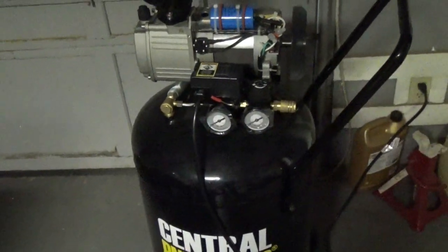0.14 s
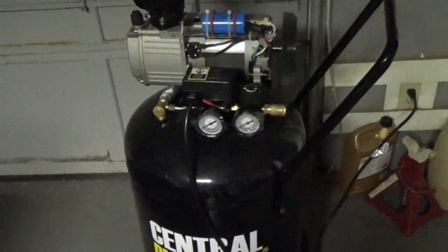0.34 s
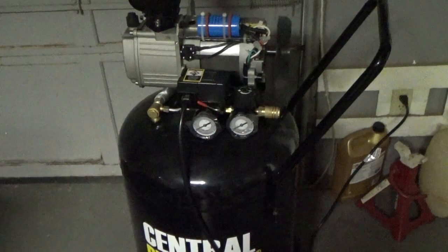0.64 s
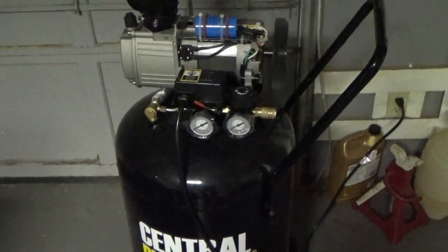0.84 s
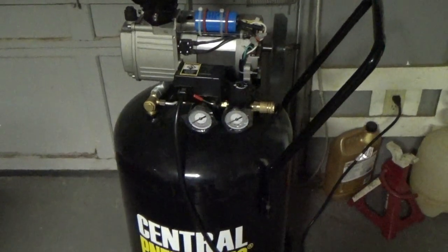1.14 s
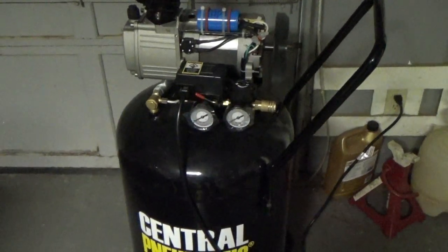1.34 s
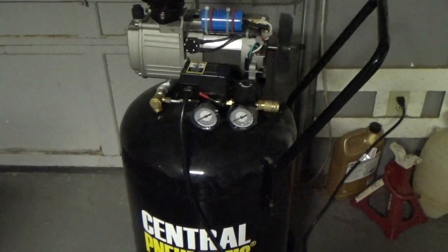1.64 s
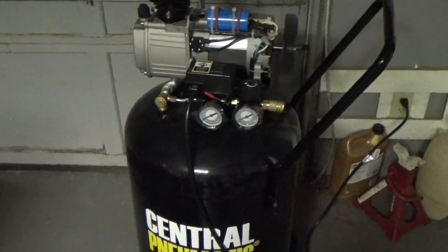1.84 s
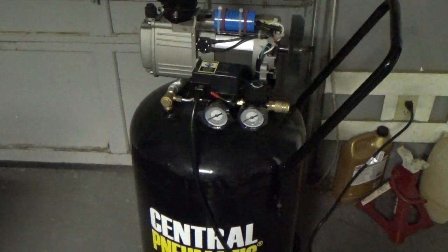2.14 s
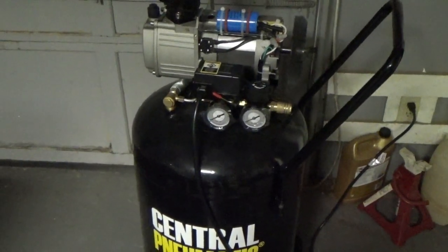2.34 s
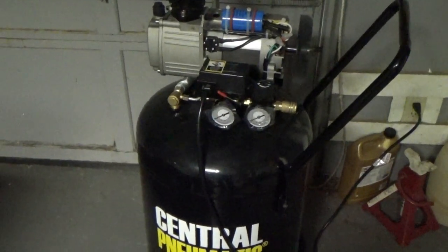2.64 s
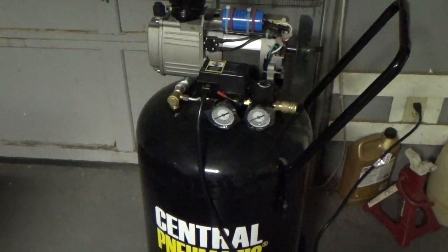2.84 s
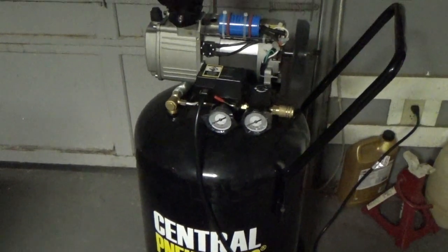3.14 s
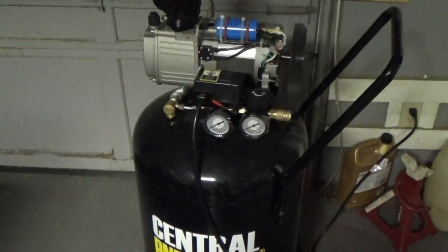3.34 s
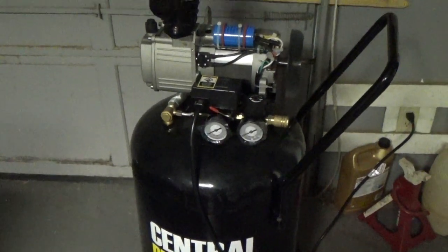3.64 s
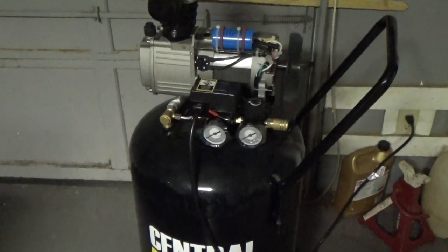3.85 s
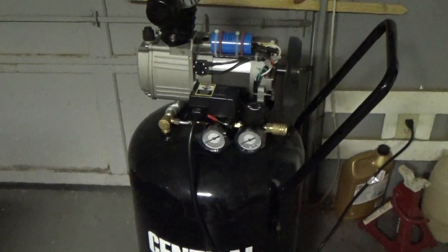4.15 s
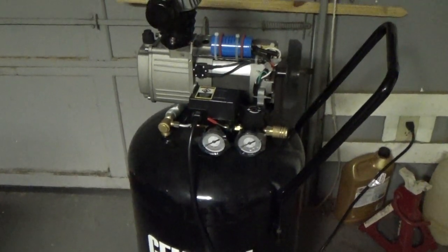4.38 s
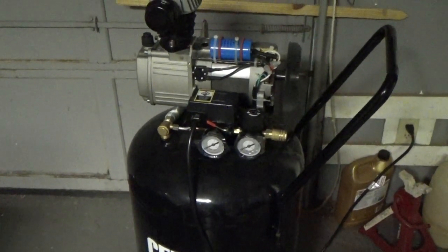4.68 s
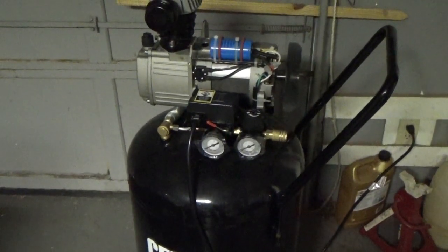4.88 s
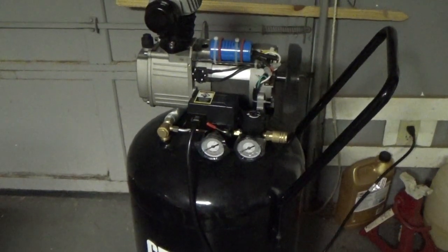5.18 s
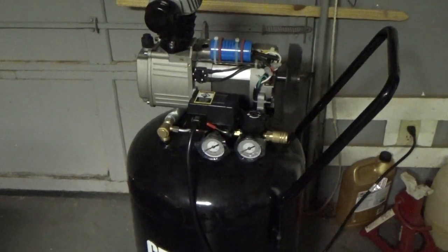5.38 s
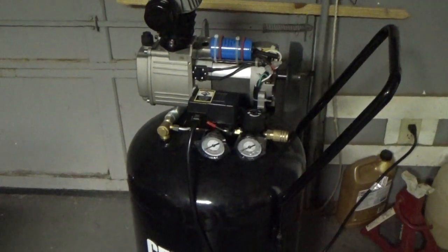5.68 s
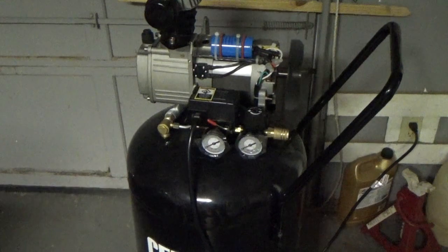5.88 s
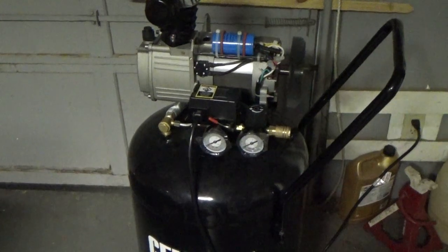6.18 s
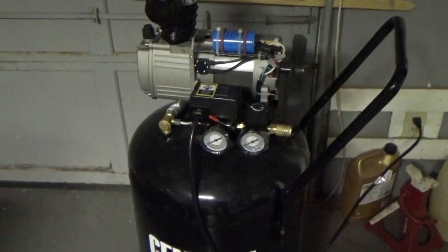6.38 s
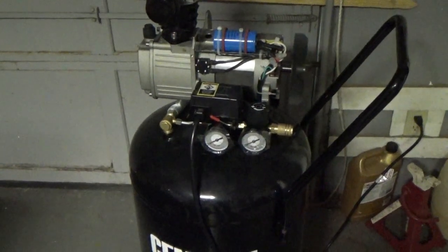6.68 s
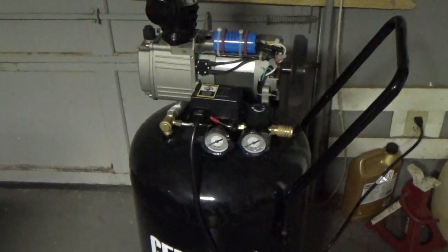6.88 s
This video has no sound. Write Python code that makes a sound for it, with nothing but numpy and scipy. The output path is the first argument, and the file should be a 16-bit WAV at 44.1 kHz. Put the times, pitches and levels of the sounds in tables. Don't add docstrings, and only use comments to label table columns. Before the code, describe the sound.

A piston air compressor runs steadily in a garage, a rough buzzing hum with metallic clatter and sharp airy hiss, growing slightly closer.

```python
import sys
import numpy as np
from scipy import signal
from scipy.fft import rfft, irfft
from scipy.io import wavfile
from scipy.ndimage import uniform_filter1d

SR = 44100
rng = np.random.default_rng(int(sys.argv[2]) if len(sys.argv) > 2 else 0)


def master(y):
    cut = np.clip(np.atleast_2d(y).T, -1, 1)
    pcm = np.round(cut * 32767)
    wavfile.write(sys.argv[1], SR, pcm.astype(np.int16))


def decibels_to_gain(level_db):
    exponent = np.asarray(level_db, float) / 20
    return 10 ** exponent


N = 309582


def level(x, db):
    return x * decibels_to_gain(db) / np.sqrt(np.mean(x ** 2))


def curves(table):
    s, *columns = np.transpose(table)
    return [np.interp(np.arange(N) / SR, s, c) for c in columns]


def bins_hz():
    return np.arange(N // 2 + 1) * SR / N


def along(table, hz):
    f, v = np.transpose(table)
    return np.interp(np.log(hz + 1), np.log(f + 1), v)


def colour(x, table):
    hz = bins_hz()
    inside = (hz > table[0][0]) & (hz < table[-1][0])
    return irfft(rfft(x) * decibels_to_gain(along(table, hz)) * inside, N)


def ring(x, modes):
    out = 0
    for hz, width, db in modes:
        b, a = signal.iirpeak(hz, hz / width, SR)
        out = out + decibels_to_gain(db) * signal.lfilter(b, a, x)
    return out


def steep(x, modes):
    out = 0
    for hz, width, db in modes:
        once = ring(x, [(hz, width, 0)])
        out = out + ring(once, [(hz, width, db)])
    return out


def walk(rate):
    levels = rng.standard_normal(int(N / SR * rate) + 2)
    steps = uniform_filter1d(np.repeat(levels, 8), 8)
    return np.interp(np.arange(N) * rate * 8 / SR, np.arange(len(steps)), steps)


def echoes(x, t60_s):
    t = np.arange(SR // 2) / SR
    tail = rng.standard_normal(len(t)) * np.exp(-np.log(1000) * t / t60_s)
    return signal.fftconvolve(x, tail / np.sqrt(np.sum(tail ** 2)))[:N]


def repeating(turn, memory, size):
    keep = np.exp(-1 / memory)
    turns = int(turn[-1])
    fresh = rng.standard_normal((turns + 100, size))
    rounds = signal.lfilter([np.sqrt(1 - keep ** 2)], [1, -keep], fresh, axis=0)
    rounds = rounds[-turns - 2:]
    return rounds.ravel()[(turn * size).astype(int)]


# (time [s], rate [turns/s])
SHAFT_SPEED = [(0, 57.59), (1.4, 57.614), (2.3, 57.618), (3.1, 57.598), (7.02, 57.582)]


def shaft_turns():
    return np.cumsum(curves(SHAFT_SPEED)[0]) / SR


# (time [s], closeness [0 far - 1 near])
STANCE_PATH = [
    (0, 0.069),
    (2.9, 0.069),
    (3.5, 0.55),
    (4.9, 0.64),
    (7.02, 1),
]


def closeness():
    return curves(STANCE_PATH)[0]


def heard(levels_db, beams=()):
    edge_s = 0.17
    t, close = np.arange(N) / SR, closeness()
    out = [far + (near - far) * close for far, near in levels_db]
    for part, start, end, db in beams:
        inside = np.clip(np.minimum(t - start, end - t) / edge_s + .5, 0, 1)
        out[round(part)] = out[round(part)] + db * inside
    return out


# (multiple of the shaft rate [-], level [dB])
HUM_FAR_LINES = [(1, -36), (2, -23.5), (3, -14.5), (4, -12.5), (5, -7), (6, -24.5), (7, -9.5), (8, 0.5),
                 (9, -5), (10, -15), (11, 0), (12, -19), (13, 0.5), (14, -48), (15, -9), (16, -9),
                 (17, -20), (18, -21.5), (19, -22.5), (20, -14.5), (21, -12), (22, -32), (23, -11),
                 (24, -24), (25, -38), (26, -25), (27, -11.5), (28, -34), (29, -6), (30, -29)]
# (multiple of the shaft rate [-], level [dB])
HUM_NEAR_LINES = [(1, -41), (2, -20.5), (3, -11.5), (4, -8.5), (5, -5.5), (6, -24), (7, -11), (8, 1.5),
                  (9, -10.5), (10, -1), (11, -3), (12, -13.5), (13, -4), (14, -9), (15, -7), (16, -6.5),
                  (17, -16), (18, -17), (19, -33), (20, -14.5), (21, -9.5), (22, -39), (23, -42), (24, -16),
                  (25, -29), (26, -17.5), (27, -32), (28, -26), (29, -7), (30, -21)]
TURN_THUDS = [
    (.158, .41),
    (.322, .98),
    (.852, .95),
]


def hum(turn):
    place, size = np.transpose(TURN_THUDS)
    moved = np.clip(closeness(), 0, 1)
    out = 0
    for (k, far_db), (_, near_db) in zip(HUM_FAR_LINES, HUM_NEAR_LINES):
        thud_phase = np.angle(np.sum(size * np.exp(-2j * np.pi * k * place)))
        start = thud_phase - np.pi / 2 + 2.4 / k
        gain = decibels_to_gain(far_db) + (decibels_to_gain(near_db) - decibels_to_gain(far_db)) * moved
        waver = .08 * walk(3)
        out = out + gain * np.cos(2 * np.pi * k * turn + start + waver)
    return level(out, 0)


# (place in the turn [0-1], level [dB], ringing part [index])
VALVE_KNOCKS = [(.45, -2, 0), (.75, -1, 0), (.97, -1, 0), (.24, -3, 1), (.55, 0, 1), (.8, -7, 1),
                (.8, 0, 2), (.03, -9, 2), (.57, -10, 2), (.58, -6, 3), (.8, 0, 3), (.04, -5, 3),
                (.26, -2, 4), (.54, 0, 4), (.04, -2, 4), (.27, 0, 5), (.58, -3, 5), (.02, 0, 6),
                (.48, -2, 6)]
# (frequency [Hz], width [Hz], level [dB])
PART_MODES = [
    [(2236, 60, 0)],
    [(2995, 110, 0), (3110, 40, -6)],
    [(4745, 170, 0), (4550, 30, -6)],
    [(5015, 45, 0), (5345, 80, -2), (2822, 20, -3), (1960, 35, -3)],
    [(6600, 60, 0), (7960, 40, 0), (8230, 30, -1), (7620, 60, -4), (5520, 45, -2)],
    [(2420, 25, 0), (2822, 25, 0), (3170, 30, 0), (6280, 28, -2), (5300, 30, -3)],
    [(4085, 30, 5), (5640, 35, -3), (3510, 25, -2), (2020, 28, -1), (3050, 30, -1)],
]
# (far level [dB], near level [dB])
PART_LEVELS = [(-42, -40), (-33, -44), (-41, -41), (-38, -42), (-41, -43), (-46, -42), (-46, -43)]
# (part [index], start [s], end [s], gain [dB])
PART_BEAMS = [(0, 0, .5, 6), (0, 2.5, 2.8, 9), (0, 3.3, 4.1, 7), (0, 4.4, 5, 5), (0, 5.25, 5.7, 5),
              (0, 6.05, 7.1, 6), (1, -.2, 1, 3.5), (1, 1.6, 2.6, 2), (1, 6.2, 7.1, 5), (2, .75, 3.4, 9),
              (2, 1.7, 2.4, 3), (2, 5.2, 6.4, 3), (3, .75, 3.4, 5), (4, 1.8, 3.2, 4), (5, -.2, .6, 7),
              (5, 4, 7.1, 2), (5, 5, 7.1, 4), (6, 3.8, 5, 8), (6, 5.6, 6.1, 5)]


def knocks(turn):
    hits, s = np.zeros((len(PART_MODES), N)), np.arange(N)
    whole = np.arange(1, int(turn[-1]))
    for place, db, part in VALVE_KNOCKS:
        time_chance, force_chance = rng.standard_normal((len(whole), 2)).T
        at = np.interp(whole - 1 + place + .0004 * time_chance, turn, s)
        at = np.clip(at, 0, N - 2)
        i = at.astype(int)
        force = decibels_to_gain(db + 1.5 * force_chance + 1.0 * walk(6)[i])
        hits[int(part), i] += force * (1 - at + i)
        hits[int(part), i + 1] += force * (at - i)
    hits[0] += .07 * rng.standard_normal(N) * decibels_to_gain(2.2 * walk(8))
    rings = 0
    for hit, modes, db in zip(hits, PART_MODES, heard(PART_LEVELS, PART_BEAMS)):
        rings = rings + level(ring(hit, modes), db)
    return rings + decibels_to_gain(-13.5) * echoes(rings, t60_s=0.38)


# (frequency [Hz], level [dB per Hz])
CLATTER_SPECTRUM = [(410, -47), (700, -14), (738, 3.5), (796, -4), (895, 3.5), (975, -0.5), (1450, -3),
                    (2220, -1), (2520, 4), (4260, -1.5), (4890, -3.5), (6960, -3.5), (9000, -20),
                    (11700, -37), (19800, -120)]


def clatter(turn):
    pattern = uniform_filter1d(repeating(turn, 200., size=30), 15)
    bunches = decibels_to_gain(3.0 * pattern + .8 * walk(7))
    rattle = bunches * repeating(turn, 30., size=700)
    return level(colour(rattle, CLATTER_SPECTRUM), 0)


def puff(turn, place, fade):
    return uniform_filter1d(np.exp(-((turn - place) % 1) / fade), size=12)


def snaps(turn, place):
    at = np.flatnonzero(np.diff(np.floor(turn - place)))
    out = np.zeros(N)
    out[at] = decibels_to_gain(2.0 * rng.standard_normal(len(at)))
    return out


# (place in the turn [0-1], level [dB], fade [turns])
VALVE_PUFFS = [
    (.04, 0, 0.065),
    (0.229, 3.5, 0.13),
    (.4, 2, 0.058),
    (.53, 1.5, 0.11),
    (.68, 2, 0.21),
]
# (frequency [Hz], level [dB per Hz])
HISS_SPECTRUM = [(880, -38), (1500, -25), (1630, -10.5), (2220, -3.5), (2440, -14), (2920, -7.5),
                 (4280, -11), (4700, -5.5), (7150, -9.5), (9880, 1), (10800, -4), (13500, -1), (14600, -27)]
# (frequency [Hz], width [Hz], level [dB])
PASSAGE_MODES = [
    [(9105, 120, 0), (8870, 100, -3)],
    [(9855, 70, 0), (9650, 70, -5), (10205, 110, -5)],
    [(11320, 190, 0), (9330, 60, -3)],
    [(13083, 60, 0), (13390, 120, -1), (13850, 800, -6)],
    [(10830, 110, 0), (12380, 150, -1)],
]
PASSAGE_TIMES = [(0.4, .3), (0.1, 0.21), (0, .15), (.23, 0.51), (0.3, .3)]
# (far level [dB], near level [dB])
PASSAGE_LEVELS = [(-47.5, -40), (-28, -31.5), (-35, -52), (-29, -30), (-42, -44)]
# (group [index], start [s], end [s], gain [dB])
PASSAGE_BEAMS = [(0, 3, .7, 9), (0, 4, 4.6, 10.5), (0, 1, 5.6, 4), (1, 3.5, 3.05, 0.5), (1, 6.5, 7.1, 2.5),
                 (2, 0, 1.5, 6.5), (3, 0, 1.6, -3), (3, 6.6, 7.1, -5), (4, 4.6, 5, -4), (4, 1, 8.5, -7)]


def hiss(turn):
    leak_db, snap_db = -6, 2
    gate = decibels_to_gain(leak_db)
    for place, db, fade in VALVE_PUFFS:
        gate = gate + decibels_to_gain(db) * puff(turn, place, fade)
    gate = gate * decibels_to_gain(0.99 * uniform_filter1d(repeating(turn, 27.0, size=50), 11))
    turbulence = rng.standard_normal(N) + 0.57 * repeating(turn, 5.2, size=760)
    air = level(gate * turbulence, 0)
    sung = 0
    song_db = heard(PASSAGE_LEVELS, PASSAGE_BEAMS)
    for group, (place, fade), db in zip(PASSAGE_MODES, PASSAGE_TIMES, song_db):
        blown = (0.32 + puff(turn, place, fade)) * air
        struck = level(snaps(turn, place), snap_db)
        sung = sung + decibels_to_gain(db) * level(steep(blown + struck, group), 0)
    return level(colour(air, HISS_SPECTRUM), -18.5) + sung


# (frequency [Hz], level [dB per Hz])
FAN_SPECTRUM = [(15, -30), (100, -25), (200, -16), (300, -9), (500, -5.5), (700, -3), (1200, -6),
                (2200, -4.5), (4000, -9), (7000, -27)]
# (frequency [Hz], width [Hz], level [dB])
TANK_MODE = (682, 6, -40.5)


def fan():
    hz, width, db = TANK_MODE
    ringing = ring(rng.standard_normal(N), [(hz, width, 0)])
    shell = level(ringing * decibels_to_gain(2.0 * walk(2.44)), db)
    rush = level(colour(rng.standard_normal(N), FAN_SPECTRUM), -30)
    return decibels_to_gain(1.0 * walk(6)) * rush + shell


# (frequency [Hz], phase [rad])
PORT_LEAD = [(0, .06), (150, .17), (520, .58), (1030, .5), (1400, .25), (2200, .3), (3700, .3), (5000, .1),
             (15000, .05)]
# (frequency [Hz], level [dB])
SIDE_WALLS = [(60, -22), (250, -16), (600, -12), (1300, -13), (2400, -12), (4300, -12), (6500, -14),
              (9500, -20), (13000, -16), (15000, -18)]


def two_ports(mid):
    left_db, side_db, side_from_hz = -0.4, 0.3, 590
    hz = bins_hz()
    lead = np.exp(.5j * along(PORT_LEAD, hz)) * decibels_to_gain(left_db / 2)
    above_bass = 1 / (1 + (side_from_hz / (hz + 1)) ** 2) ** 2
    walls = decibels_to_gain(along(SIDE_WALLS, hz) + side_db) * above_bass
    side = irfft(rfft(echoes(mid, t60_s=0.4)) * walls, N)
    left = irfft(rfft(mid) * lead, N) + side
    right = irfft(rfft(mid) / lead, N) - side
    return np.array([left, right])


def scene():
    hum_db, clatter_db, fan_db = heard([(-26, -24.5), (-30, -25), (-2, 2.5)])
    turn = shaft_turns()
    mid = decibels_to_gain(hum_db) * hum(turn)
    mid = mid + knocks(turn)
    mid = mid + decibels_to_gain(clatter_db) * clatter(turn)
    mid = mid + hiss(turn)
    mid = mid + decibels_to_gain(fan_db) * fan()
    return two_ports(mid)


def band_limit(x):
    return signal.sosfilt(signal.butter(12, 15350, fs=SR, output="sos"), x)


def record(dry):
    rounded = np.tanh(dry)
    top_cut = signal.ellip(14, .5, 85, 14400, fs=SR, output="sos")
    finished = signal.sosfilt(top_cut, rounded)
    return band_limit(finished)


dry = scene()
out = record(dry)
master(out)
```